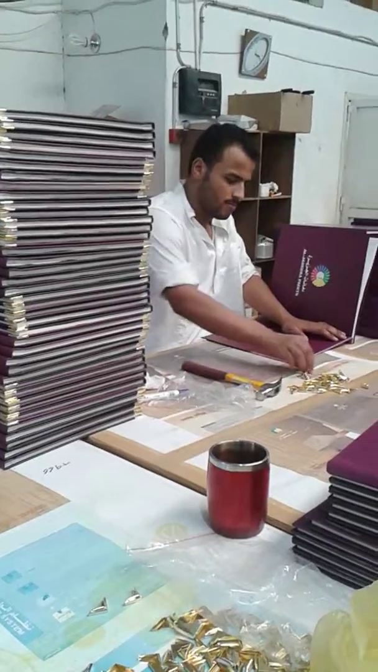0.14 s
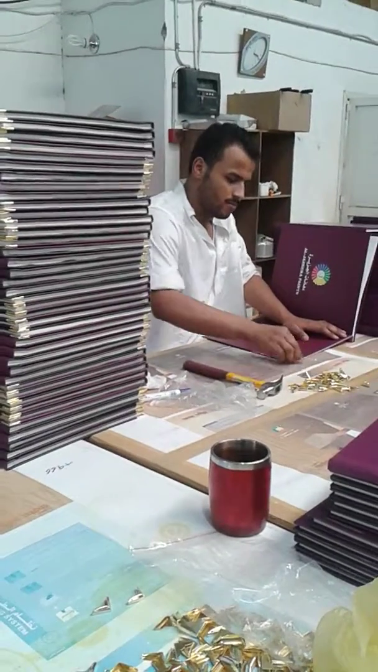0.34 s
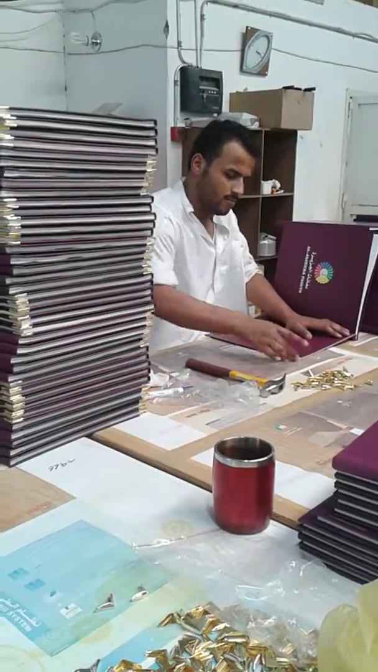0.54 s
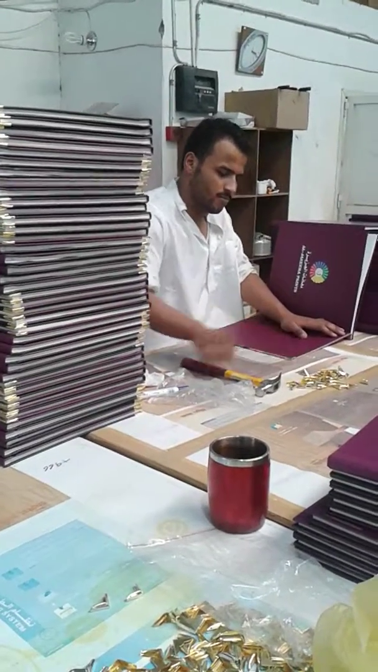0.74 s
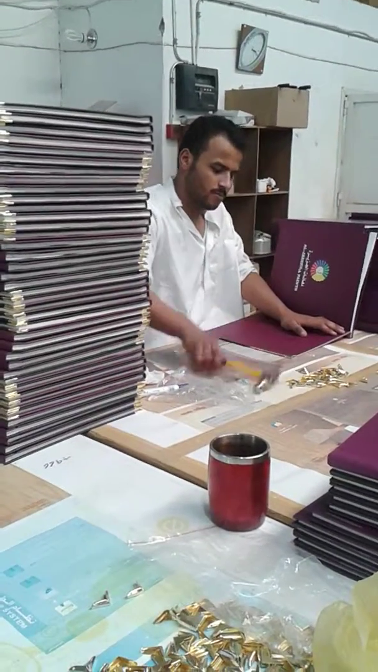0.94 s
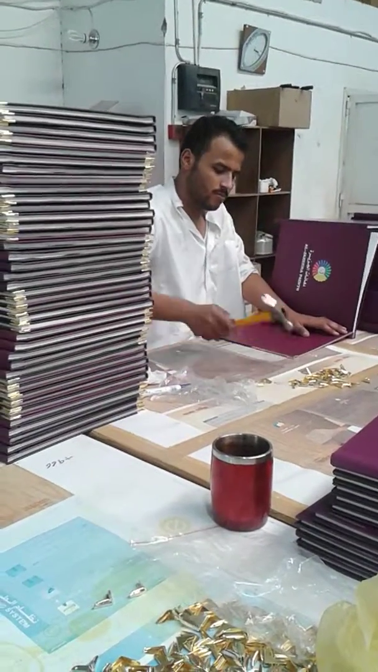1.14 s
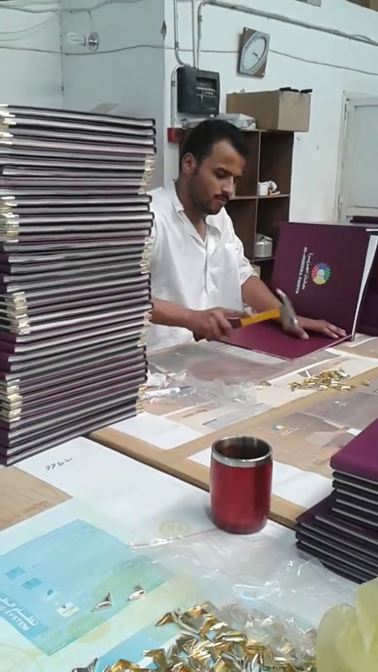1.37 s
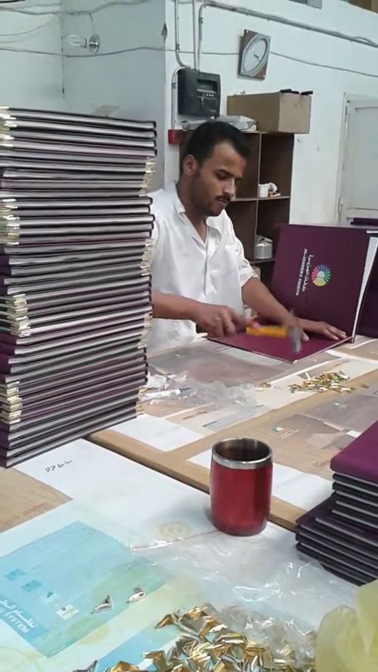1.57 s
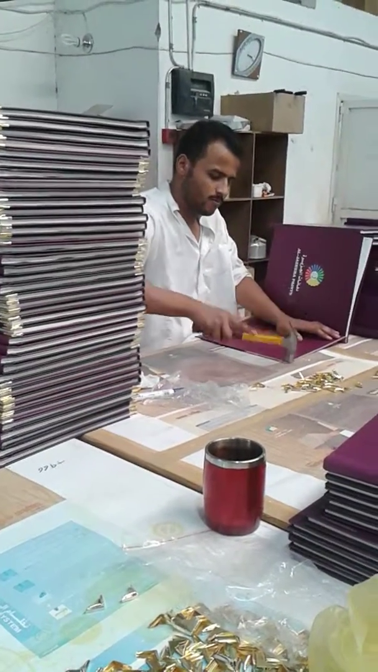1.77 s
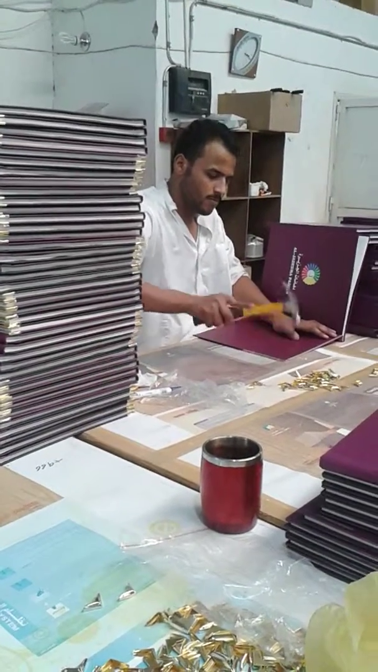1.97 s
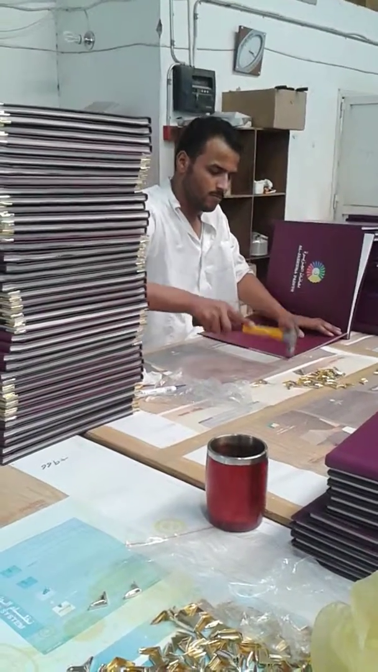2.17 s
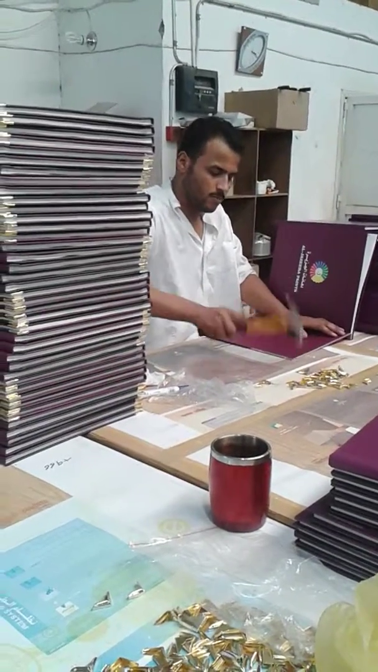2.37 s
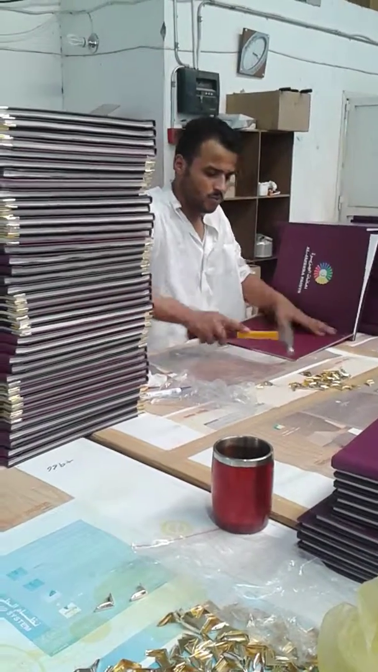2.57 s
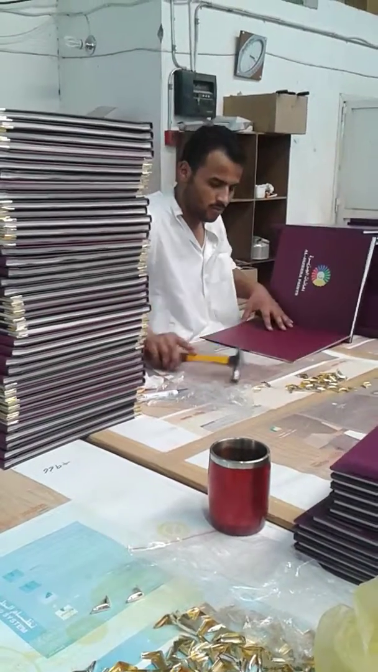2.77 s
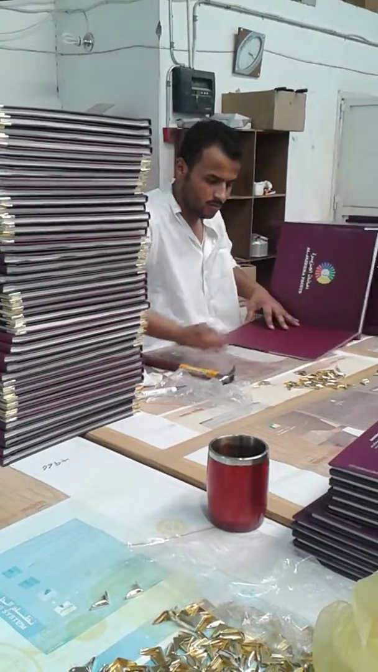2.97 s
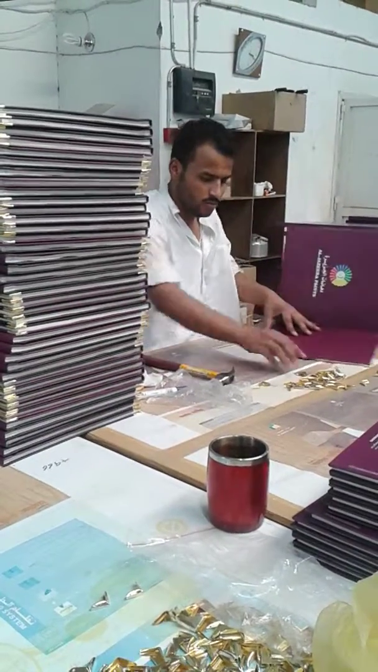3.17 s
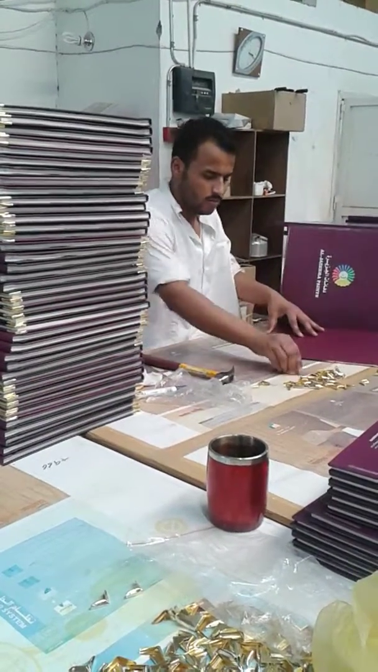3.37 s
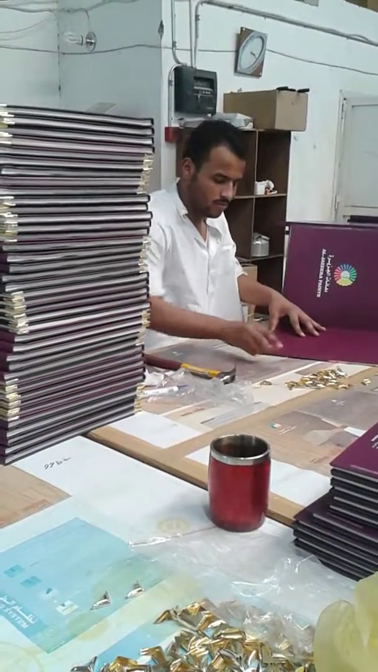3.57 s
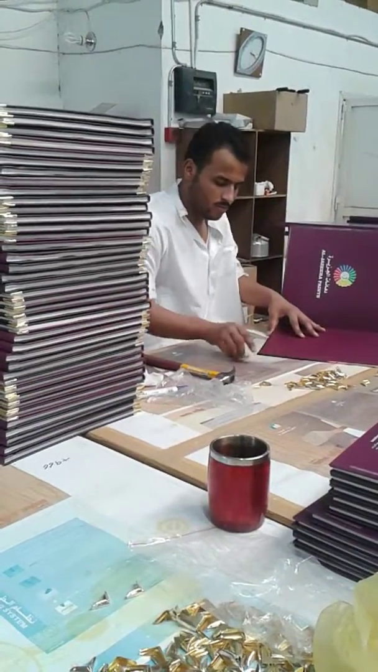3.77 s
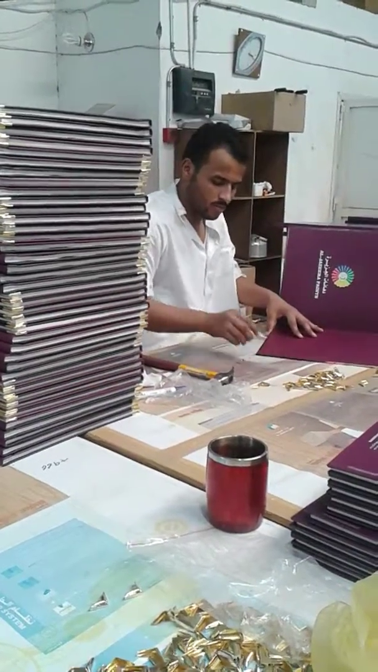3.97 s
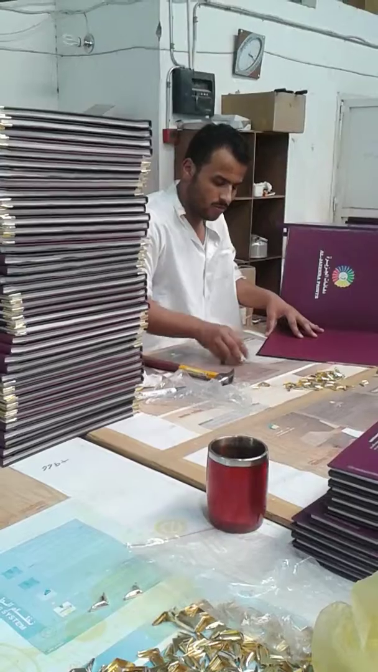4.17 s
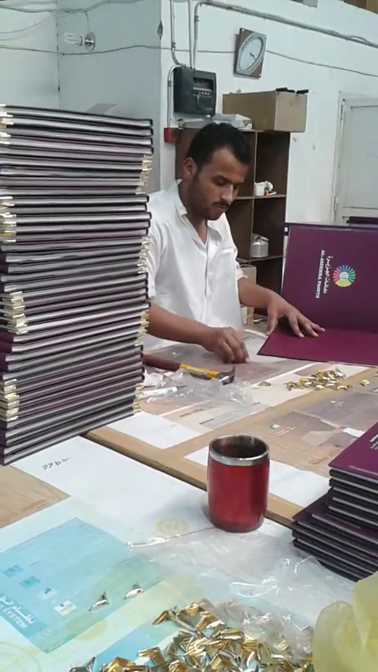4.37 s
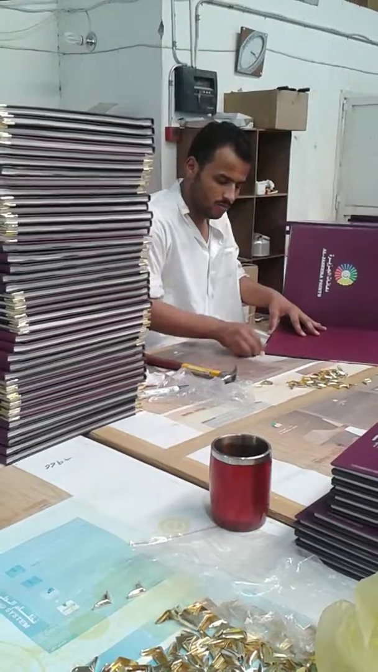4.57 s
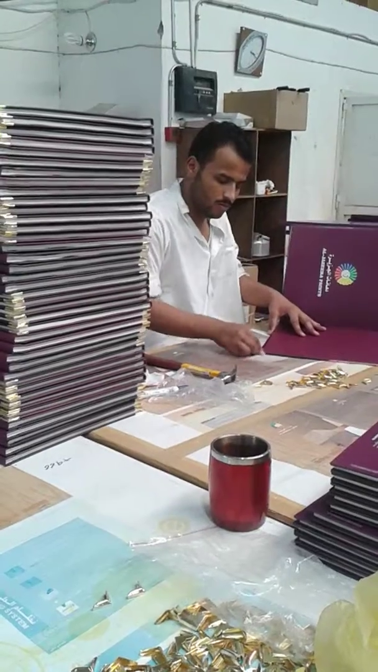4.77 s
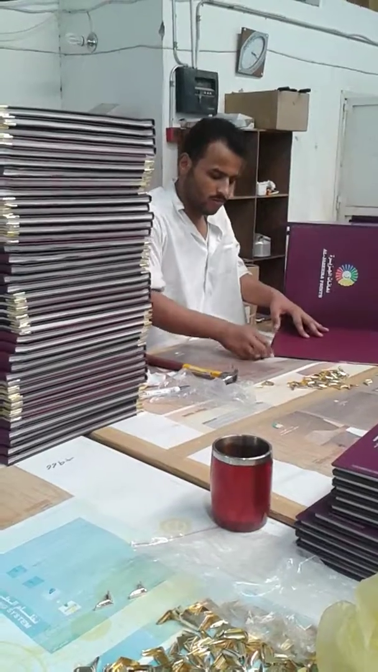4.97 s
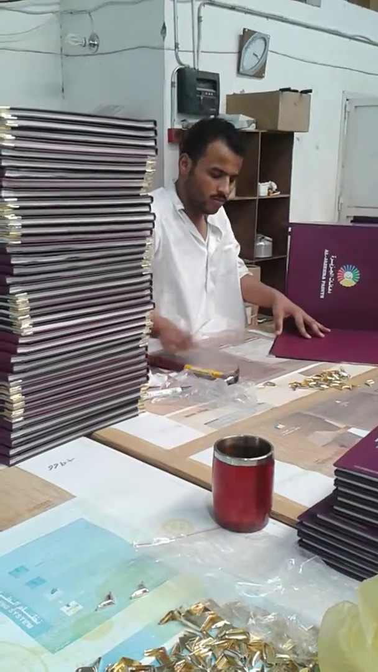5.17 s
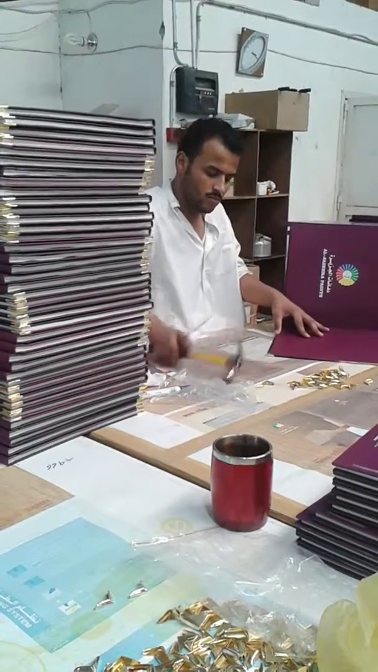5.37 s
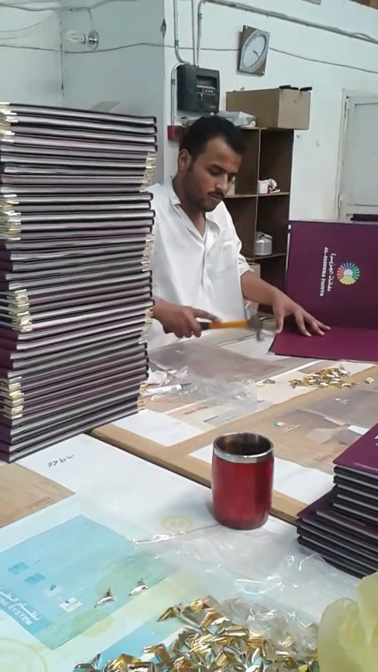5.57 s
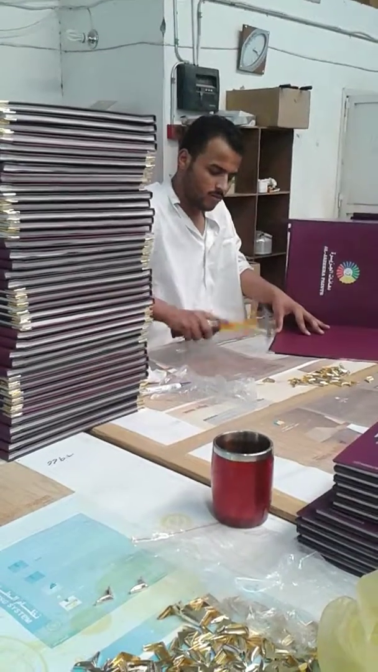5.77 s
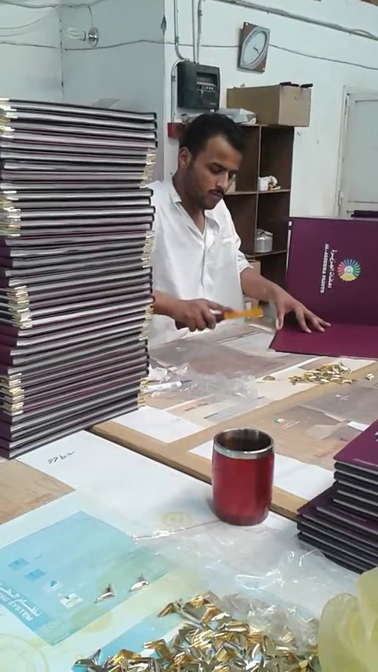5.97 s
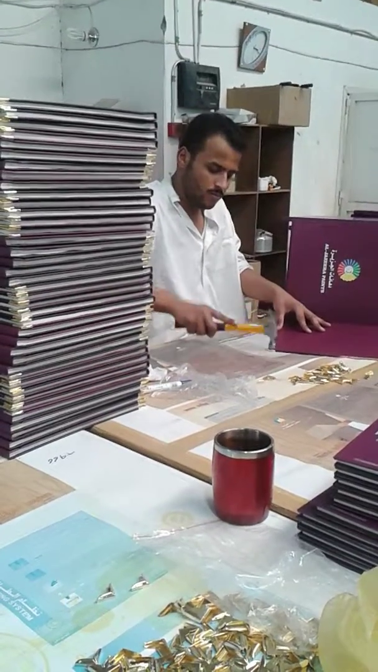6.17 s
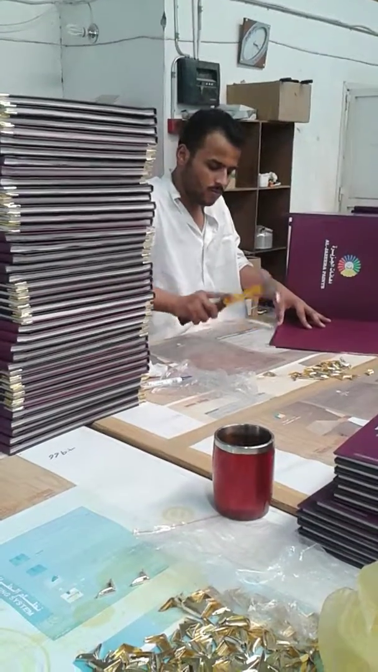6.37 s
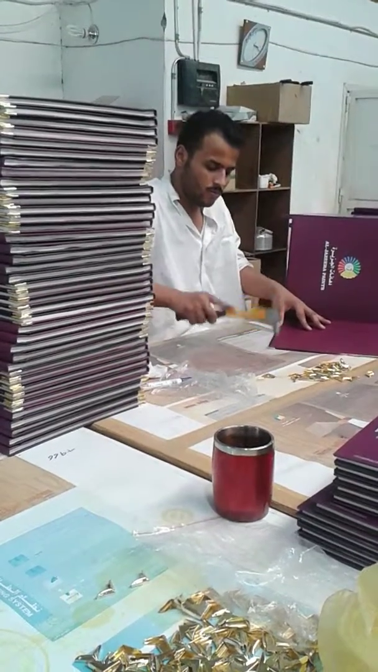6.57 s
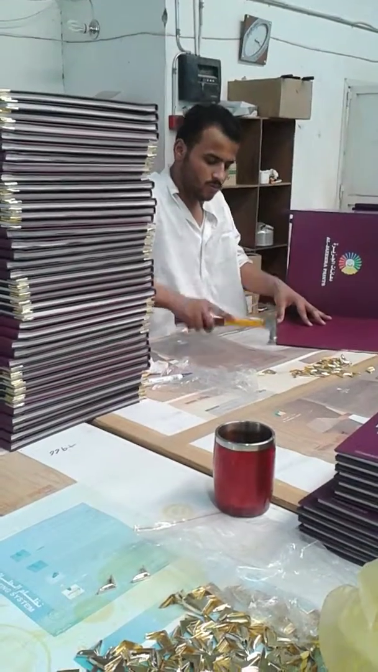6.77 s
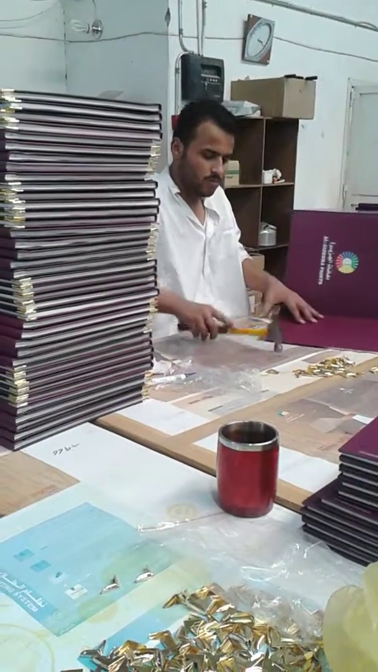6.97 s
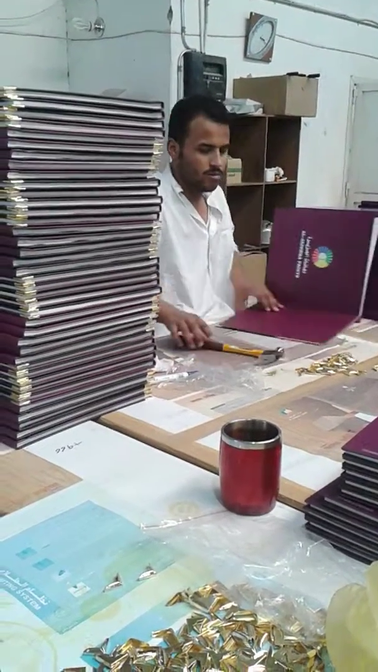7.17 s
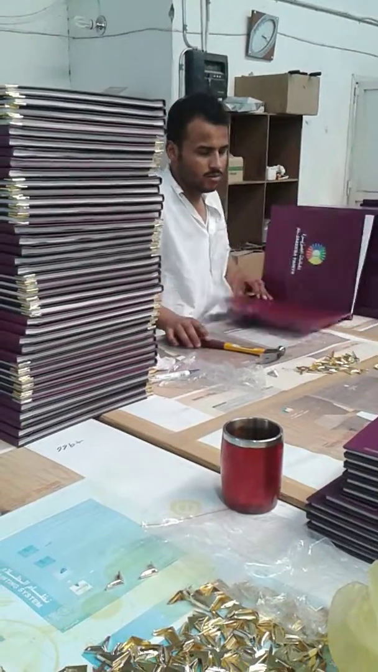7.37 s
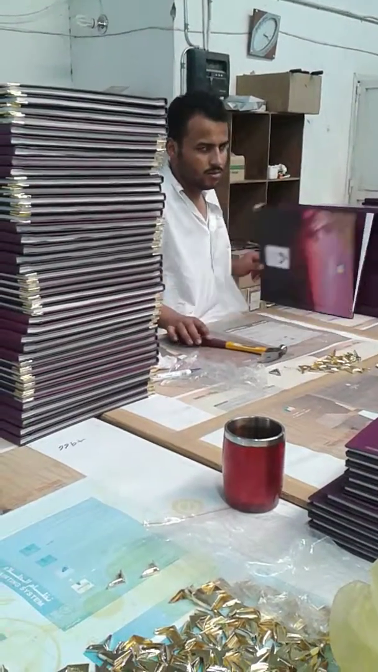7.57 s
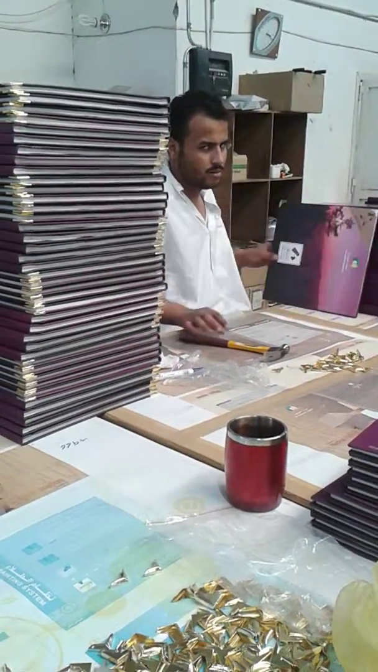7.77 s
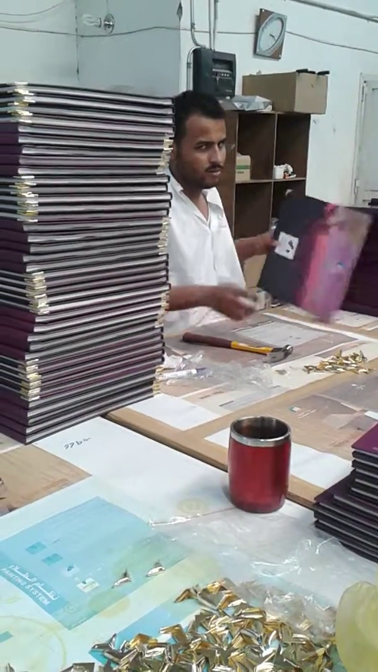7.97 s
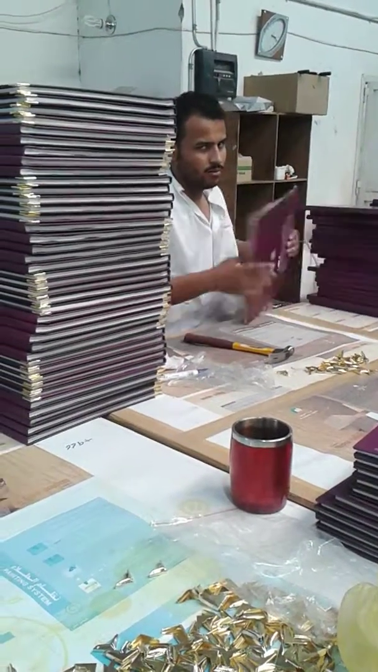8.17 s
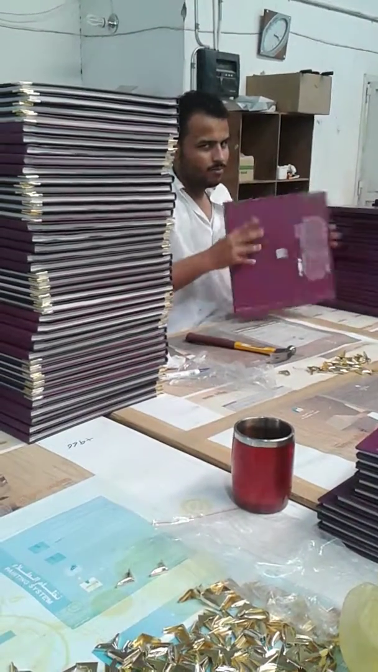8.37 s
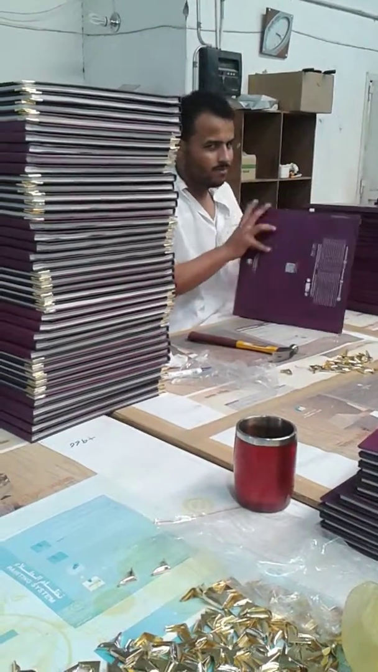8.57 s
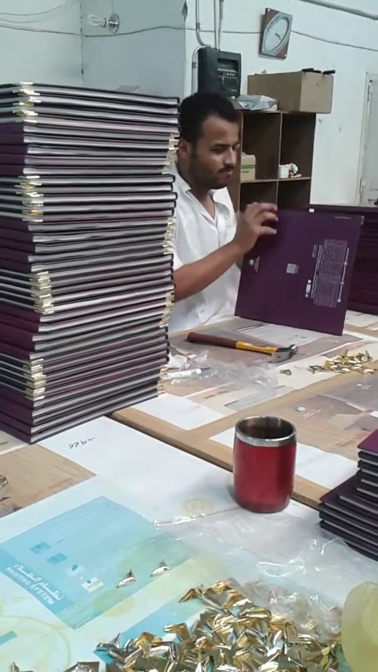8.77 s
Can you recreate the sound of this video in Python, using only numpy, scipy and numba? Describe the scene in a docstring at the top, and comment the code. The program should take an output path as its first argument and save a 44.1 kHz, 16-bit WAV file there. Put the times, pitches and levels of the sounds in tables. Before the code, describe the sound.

A claw hammer bangs metal corner pieces onto hardcover folders on a wooden table, loose pieces jingling, over a faint wavering machine whine.

```python
"""First a machine is heard further off in the workshop: wavering tones of a turning shaft over shaped noise.
Scuffs (swelling bands of noise), ticks (scratches of noise) and light taps (decaying sines) lead to the blows.
A claw hammer then beats metal corner pieces onto hardcover folders on a wooden work table: damped modes and
noise boom, a dispersed pulse shoves, a noise burst cracks and many short sines rattle as loose corner pieces.
Once a folder cover pats the table with a buzz of overtones. A limiter ducks around blows and peaks clip."""
import sys
import numpy as np
from scipy import signal
from scipy.fft import rfft, irfft, next_fast_len
from scipy.io import wavfile
from scipy.ndimage import uniform_filter1d, map_coordinates
from numba import njit

SR = 44100
rng = np.random.default_rng(int(sys.argv[2]) if len(sys.argv) > 2 else 0)


def invert_db(level):
    """Linear amplitude ratio for a level in decibels (20 dB per decade), elementwise."""
    return 10 ** (np.asarray(level, dtype=float) / 20)


def pcm_store(signal):
    """Save signal as 16-bit PCM."""
    levels = np.round(np.clip(np.atleast_2d(signal), -1, 1) * 32767)
    wavfile.write(sys.argv[1], SR, levels.astype(np.int16).T)


N = 389403  # samples


def unit(x):
    """Normalization: scale to rms 1."""
    return x / np.sqrt(np.mean(x ** 2) + 1e-20)


def along(points, hz):
    """Interpolation on a logarithmic frequency axis of points (frequency [Hz], value)."""
    f, v = np.transpose(points)
    return np.interp(np.log(hz + 1), np.log(f + 1), v)


def wobble(rate):
    """Slow random modulation: a smooth curve through `rate` random knots a second."""
    return map_coordinates(rng.standard_normal(int(N * rate / SR) + 4), [np.arange(N) * rate / SR])


def filtered(x, response):
    """Linear filtering: the spectrum of x times a response of frequency."""
    m = next_fast_len(len(x) + 8192)
    return irfft(rfft(x, m) * response(np.fft.rfftfreq(m, 1 / SR)), m)[:len(x)]


def noise(t):
    """White noise: equal power at every frequency."""
    return rng.standard_normal(len(t))


def dying(t60s, colour_db, size):
    """Frequency-dependent damping: noise starts at once and each band fades at its own rate; energy 1."""
    hz, t, z = signal.stft(rng.standard_normal(size + 512), SR, nperseg=512)
    t60 = np.clip(along(t60s, hz), .01, 3)[:, None]
    gain = invert_db(colour_db(hz)[:, None] - 60 * t / t60)
    tail = signal.istft(z * gain, SR, nperseg=512)[1][:size]
    return tail / np.linalg.norm(tail)


def add(track, s, x):
    """Superposition: mix x into track at s seconds."""
    part = track[round(s * SR):][:len(x)]
    part += x[:len(part)]


# hammer blows: (time [s], table level [dB], crack level [dB], rattle level [dB], contact brightness [dB/octave],
# ring brightness [dB/octave], place along the table [0-1])
HAMMER_BLOWS = [(1.533, -3, -22, -35.5, -1, -4, 0.54), (1.854, 0, 5, -37.5, -2, -2.5, 1),
                (2.153, 3, -3, -36, 1.5, -2, 0.67), (2.409, -1, 7, -31, 0.5, -3.5, 0.4),
                (2.469, 1.5, 10, -38, 3, -1.5, 0.6), (2.785, 1, 17.5, -31, 3.5, -7, 0.5),
                (2.99, -4.5, -14, -42, 4, 0.5, 0.42), (3.107, 1, 11.5, -31.5, 0.5, -3.5, 0.67),
                (3.452, 2, 20, -29, 1.5, 1.5, 0.32), (3.898, 2.5, 22, -30, -1, 8, 0.6),
                (4.1, -6, 8.5, -38, 8.5, 4.5, 1), (5.863, -4, 1, -35.5, 2, -6, 0),
                (6.188, -5.5, 4, -35, 4, -7.5, 0.5), (6.504, 4, 14, -35, 2.5, 5, 0.42),
                (6.835, 6.5, 15, -34, 3, 4, 0.9), (7.121, -1, 12, -42, -1.5, 13, 0.85),
                (7.345, -6, 12.5, -31.5, 7.5, -1.5, 0.95), (7.74, 0.5, 12, -30.5, 5, -0.5, 0.88),
                (8.498, -2.5, 17, -32, 5.5, -2, 1)]


def hammer():
    """Impact excitation: each blow cracks on metal, shoves and rings the table and shakes loose pieces."""
    out, t = np.zeros(N), np.arange(SR * 3 // 4) / SR
    for s, boom_db, crack_db, rattle_db, bright, ring_bright, place in HAMMER_BLOWS:
        ring = invert_db(-7.5) * table_modes(t, place, ring_bright) + invert_db(23) * table_body(t, ring_bright)
        # the top hops on its frame, then settles
        shudder = 1 + 0.75 / (1 + np.exp(np.minimum((t - .058) / 0.0086, 50)))
        # small rebounds break the tail into lumps
        shudder = shudder * invert_db(2.2 * wobble(70)[:len(t)])
        onset = 1 - np.exp(-(t / 0.0045) ** 2)
        wood = (ring * shudder + invert_db(25.0) * slap(t, bright)) * onset + shove(t, bright)
        jingle = rattle_colour(rattle(t, count=160), rattle_db)
        blow = invert_db(boom_db) * wood + invert_db(crack_db) * crack(t) + invert_db(rattle_db) * jingle
        add(out, s, in_room(blow, wet_db=-8.0, delay=.006))
    return out


def octaves(f):
    """Spectral tilt: octaves from about 400 Hz, held level above the frequency where the tilt ends."""
    tilt_top_hz = 1420
    return np.log2((np.minimum(f, tilt_top_hz) + 30) / 400)


# table top modes: (frequency [Hz], level struck at the near end [dB], level at the far end [dB], slow t60 [s])
TABLE_MODES = [(116, -14, -17, 0.72), (155, -13.5, -18.5, 0.69), (226.2, -0.5, -11, 0.47),
               (273, -14, -12.5, 0.31), (334.3, -2, 3, 0.29), (408.4, -3, -3, 0.059),
               (489, -0.5, -0.5, 0.07), (651, -9.5, -18, 0.045), (793, -13.5, -8.5, 0.02),
               (996, -5.5, -12.5, 0.06)]


def table_modes(t, place, ring_bright):
    """Modal superposition: damped sines whose levels depend on where the table is struck."""
    hz, near_db, far_db, t60 = np.transpose(TABLE_MODES)[:, :, None]
    level = near_db + np.clip(place, 0, 1) * (far_db - near_db)
    # each spot struck drives the modes differently
    spot = rng.standard_normal((len(TABLE_MODES), 3))
    scatter_db, start = 1.2 * spot[:, :1], 0.3 * spot[:, 2:]
    pitch = hz * (1 + 0.012 * spot[:, 1:2])
    # things lying on the top blur the modes
    wander = 0.013 * np.cumsum(rng.standard_normal((len(TABLE_MODES), len(t))), axis=1)
    tilt_db = 0.61 * ring_bright * np.maximum(octaves(hz), -0.3)
    swing = invert_db(level + scatter_db + tilt_db) * np.sin(2 * np.pi * pitch * t + start + wander)
    # near the spot the first swings are far larger
    fade = invert_db(-60 * t / t60) + 5 * invert_db(-60 * t / 0.061)
    return (swing * fade).sum(axis=0) / np.linalg.norm(invert_db(level))


# dense table ring, before tilt: (frequency [Hz], relative level [dB per Hz])
BODY_COLOUR = [(15, -61), (25, -40), (158, -10), (222, 6), (277, -6), (338, 0.5), (642, -9.5),
               (1290, -11.5), (2410, -25), (3000, -31), (3900, -18), (6600, -120)]
# its damping: (frequency [Hz], t60 [s])
BODY_FADE = [(60, 0.13), (300, 0.32), (1000, 0.14), (1500, 0.076), (3000, 0.013)]


def table_body(t, ring_bright):
    """High modal density: modes too close to separate ring as coloured, decaying noise."""
    def colour_db(f):
        tilt_db = ring_bright * np.maximum(octaves(f), -0.3)
        return along(BODY_COLOUR, f) + tilt_db + 3 * np.minimum(octaves(f), 1.2)
    return dying(BODY_FADE, colour_db, size=len(t))


def slap(t, bright):
    """Contact stiffness: a harder contact gives a brighter, quickly damped burst."""
    def colour_db(f):
        return along(BODY_COLOUR, f) + bright * octaves(f)
    return dying([(300, 0.044), (1500, 0.059)], colour_db, size=len(t))  # (frequency [Hz], t60 [s])


def shove(t, bright):
    """Dispersion of bending waves: the treble travels faster, so the first push falls in pitch."""
    level_db, centre_hz = 26, 428
    lag = 0.0024  # s, of waves at 400 Hz behind the fastest

    def push(f):
        band = f / centre_hz / (1 + (f / centre_hz) ** 3.54)
        # the second term moves the whole chirp a little earlier
        bending = np.exp(-4j * np.pi * lag * np.sqrt(400 * f) + 2j * np.pi * f * lag / 10)
        return invert_db(bright * octaves(f)) * band * bending
    chirp = filtered(1.0 * (t == 0), push)
    return invert_db(level_db) * chirp / np.linalg.norm(chirp)


def crack(t):
    """Broadband impact noise: metal on metal gives a short burst with a quick onset."""
    burst = filtered(noise(t), lambda f: f / (f + 1500) / (1 + (f / 5500) ** 3))
    return burst * invert_db(-60 * t / 0.019) * (1 - np.exp(-t / 0.0032))


def rattle(t, count):
    """Many random micro-impacts: loose corner pieces jump with the table and land in a dense jingle."""
    piece_hz, piece_spread = 4704, 0.115  # main ring of a piece, and its relative scatter either way
    when, pitch, size = rng.random((count, 3)).T
    landing = .008 + 0.046 * when[:, None] ** 1.1  # s after the blow
    age = np.maximum(t[:SR // 6] - landing, 0)
    hz = 2600 * 5.6 ** pitch[:, None]
    hz[::4] = piece_hz * (1 + piece_spread * (2 * pitch[::4, None] - 1))
    # each ring loses 60 dB in 160 cycles
    level_db = 2.8 * size[:, None] ** 3 - 4 * pitch[:, None] - 60 * age * hz / 160
    clinks = invert_db(level_db) * np.sin(2 * np.pi * hz * age)
    clinks = np.pad(unit(clinks.sum(axis=0)), (0, len(t) - SR // 6))
    fizz = filtered(noise(t), lambda f: f / (f + 5000) * (1 + 0.27 * (f / 13000) ** 4))
    fizz = fizz * (t / 0.033 * np.exp(1 - t / 0.042)) ** 2
    return clinks + 0.7 * fizz * invert_db(2.2 * wobble(250)[:len(t)])


def rattle_colour(jingle, rattle_db):
    """Level-dependent spectrum: pieces that are shaken harder sound brighter."""
    tilt = 0.51 * (rattle_db + 32.5)  # dB per octave
    return filtered(jingle, lambda f: invert_db(tilt * np.log2((f + 2000) / 7000)))


# light taps, rebounds of the hammer and things laid down:
# (time [s], knock level [dB], pitch [Hz], table thud level [dB])
LIGHT_TAPS = [(.603, -2, 1094, -19), (0.677, -9.5, 750, -20.5), (.693, -17, 1135, -30),
              (0.852, -27, 705, -22), (1.935, -14, 1175, -31), (2.258, -7.5, 1173, -14.5),
              (2.554, -9.5, 1280, -26), (2.828, -5, 940, -4), (3.03, -6, 500, -16), (3.15, -4, 810, -24),
              (3.501, -4, 1035, -12), (3.883, -18, 994, -14), (3.945, 4, 558, -8), (4.114, 3.5, 1160, -12),
              (5.963, -3, 1276, -18), (6.287, 0.5, 1203, -13.5), (6.637, 4, 1223, -11),
              (6.979, 4.5, 1247, -9.5), (7.167, -2, 384, -7), (7.781, -6, 794, -14),
              (8.131, -17.5, 1094, -22.5), (8.531, -14, 1140, -24), (8.553, -12, 395, -16)]


def taps():
    """Light impact: a rough knock at its own pitch, a swing of the table modes and some metal grit."""
    lower_ratio, lower_db = 0.8, -3  # second, lower mode: pitch ratio and level
    grit_db = -23.5  # under the knock
    out, t = np.zeros(N), np.arange(SR // 2) / SR
    mode_hz, level, _, _ = np.transpose(TABLE_MODES)[:, :, None]
    for s, db, hz, thud_db in LIGHT_TAPS:
        def knock_band(f):
            return 1 / (1 + ((f - hz) / (0.24 * hz)) ** 4) + 0.07 / (1 + (f / 2300) ** 6)
        rough = unit(filtered(noise(t), knock_band))
        pair = np.sin(2 * np.pi * hz * t) + invert_db(lower_db) * np.sin(2 * np.pi * lower_ratio * hz * t)
        # higher knocks fade faster
        knock = (0.62 * pair + 0.45 * rough) * invert_db(-60 * t * (hz / 1000) ** 0.4 / 0.045)
        spot = rng.standard_normal((len(TABLE_MODES), 2))
        swing = invert_db(level + 4.1 * spot[:, :1] - 60 * t / 0.058)
        swing = swing * np.sin(2 * np.pi * mode_hz * t + 2 * spot[:, 1:])
        tap = invert_db(db) * (knock + invert_db(grit_db) * grit(t)) + invert_db(thud_db) * swing.sum(axis=0)
        onset = 1 - np.exp(-t / 0.0015)
        add(out, s, in_room(tap * onset, wet_db=-8.5, delay=0.00542))
    return out


# a folder cover patting the table: (time [s], level [dB], pitch [Hz], length to half amplitude [s])
COVER_PATS = [(5.301, -15, 349, 0.01)]


def pats():
    """Harmonic series: a short buzz with overtones that stops as the cover settles."""
    out, t = np.zeros(N), np.arange(SR // 3) / SR
    for s, db, hz, length in COVER_PATS:
        buzz = sum(invert_db(-6.5 * k) * np.sin(2 * np.pi * (k + 1) * hz * t + k) for k in range(4))
        shape = (1 - np.exp(-t / 0.0017)) / (1 + (t / length) ** 6)
        add(out, s, invert_db(db) * in_room(buzz * shape, wet_db=-7, delay=0.0062))
    return out


# single corner pieces ticking on the table: (time [s], level [dB])
PIECE_TICKS = [(0.098, -24), (.96, -27), (3.15, -21), (5.292, -24), (5.944, -18), (7.795, -12.5),
               (8.133, -20.5)]


def ticks():
    """Small hard impact: a loose corner piece lands with a dry scratch."""
    out, t = np.zeros(N), np.arange(SR // 3) / SR
    for s, db in PIECE_TICKS:
        scratch = grit(t) * (1 - np.exp(-t / 0.00058))
        add(out, s, invert_db(db) * in_room(scratch, wet_db=-4.0, delay=0.0079))
    return out


def grit(t):
    """Resonant noise: a short metallic scratch, strongest around 3.7 kHz."""
    band = filtered(noise(t), lambda f: 1 / (1 + ((f - 3700) / 1300) ** 2) + 0.019)
    return invert_db(-60 * t / 0.061) * unit(band)


# hands and folders sliding: (middle time [s], half length to 1/e [s], level [dB], band centre [Hz])
SLIDES = [(0.8, 0.14, -35.5, 1530), (0.698, 0.05, -29, 280)]


def scuffs():
    """Friction noise: sliding contact is a grainy band of noise that swells and fades."""
    t, out = np.arange(N) / SR, np.zeros(N)
    for s, half, db, hz in SLIDES:
        band = unit(filtered(noise(t), lambda f: 1 / (1 + ((f - hz) / (0.68 * hz)) ** 4)))
        out += invert_db(db + 3.5 * wobble(110)) * np.exp(-((t - s) / half) ** 2) * band
    return out


# shaft tones, before they waver: (multiple of the shaft speed, level [dB rms])
SHAFT_TONES = [(102, -50), (108, -42), (110, -50), (113, -48), (114, -48), (117, -47), (120, -48),
               (123, -52), (125, -51), (126, -51), (201, -57), (204, -51), (210, -53), (213, -54),
               (218, -56)]
# swelling and sinking of the 96th multiple: (time [s], level [dB rms])
LOUDEST_SWELL = [(0.0, -40.5), (0.37, -45.5), (1.28, -40.5), (2.21, -45), (2.66, -40.5), (3.15, -43),
                 (3.34, -36.5), (4.131, -45), (4.33, -36), (4.89, -43), (5.31, -34), (5.85, -38),
                 (6.22, -31.5), (6.52, -37.5), (8.12, -34), (8.83, -38.5)]
# lower tones, before they waver: (frequency [Hz], level [dB rms])
LOW_TONES = [(565.2, -45), (1405, -53.5), (1486, -53)]
# colour of the machine's hiss: (frequency [Hz], relative level [dB per Hz])
HISS_COLOUR = [(15, -63), (40, -30), (100, -12), (335, -1.5), (560, -7), (1400, -8), (2220, -11),
               (2600, -9.5), (2950, -1.5), (3600, -2), (4300, -4.5), (5100, -11.5), (6210, -7.5),
               (7200, -11), (10700, -19), (14400, -28), (16000, -35)]


def machine():
    """Periodic excitation: tones at multiples of a shaft speed waver over a hiss that partly repeats each turn."""
    shaft_hz, hiss_db = 29.48, -31.5  # mean speed; hiss level before its flutter
    whine_follows = 0.16  # share of the loudest tone's swells that the other shaft tones follow
    swell_db = np.interp(np.arange(N) / SR, *np.transpose(LOUDEST_SWELL))
    drift = np.cumsum(1 + 0.000686 * wobble(6)) / SR  # s, running slightly unevenly

    def tone(hz, db):
        return np.sqrt(2) * invert_db(db) * np.sin(2 * np.pi * (hz * drift + rng.random()))
    hum = sum(tone(hz, db + 1.8 * wobble(9) + 2.2 * wobble(30)) for hz, db in LOW_TONES)
    whine = sum(tone(k * shaft_hz, db + 2.67 * wobble(7) + 2.6 * wobble(25)) for k, db in SHAFT_TONES)
    whine = whine * invert_db(whine_follows * (swell_db - swell_db.mean()))
    loudest = tone(96 * shaft_hz, swell_db + 1.5 * wobble(20))
    # one turn of noise, read again on every turn
    turn = rng.standard_normal(round(SR / shaft_hz))
    repeat = np.interp(drift * shaft_hz % 1 * len(turn), np.arange(len(turn)), turn)
    gears = filtered(repeat, lambda f: invert_db(-14 * np.log2((f + 1) / 3500) ** 2) * 0.62)
    hiss = unit(filtered(rng.standard_normal(N) + gears, lambda f: invert_db(along(HISS_COLOUR, f))))
    flutter_db = .7 * wobble(9) + .6 * wobble(2)
    return invert_db(hiss_db + flutter_db) * hiss + hum + whine + loudest


# reverberation of the workshop: (frequency [Hz], t60 [s])
ROOM_FADE = [(100, 0.75), (400, 0.94), (1200, 0.58), (4000, 1), (12000, 0.33)]


def in_room(x, wet_db, delay):
    """Reverberation: a sound plus a delayed, decaying answer, drawn anew for each impact."""
    drive_t60 = .05  # s; mostly the first large swings of an impact fill the workshop
    tail = dying(ROOM_FADE, lambda hz: 0 * hz, size=len(x))
    tail = np.pad(tail, (round(delay * SR), 0))
    early = x * invert_db(-60 * np.arange(len(x)) / SR / drive_t60)
    return x + invert_db(wet_db) * signal.fftconvolve(early, tail)[:len(x)]


def scene():
    """Superposition of pressures: all sources reach one microphone."""
    return (hammer() + taps() + pats() + ticks() + scuffs() + machine())[None]


@njit
def follower(x, fall):
    """Peak detection: a level that jumps up at once and sinks slowly."""
    level, out = 0.0, np.empty_like(x)
    for i in range(len(x)):
        level = max(abs(x[i]), level * fall)
        out[i] = level
    return out


def roll_off(x):
    """The treble ends steeply here."""
    return signal.sosfilt(signal.butter(12, 16340, fs=SR, output="sos"), x)


def record(dry):
    """Dynamic range compression: a limiter ducks over some ms around blows; swings still too large clip."""
    # first-order bass cut at 60 Hz, treble limit at 15150 Hz
    x = filtered(dry[0], lambda f: 1j * f / (1j * f + 60) * (f < 15150))
    # threshold -8 dB; the followed level sinks 300 dB per second
    peak_db = 20 * np.log10(follower(x, invert_db(-300 / SR)) + 1e-9)
    over_db = np.maximum(peak_db + 8, 0)
    cut_db = uniform_filter1d(.35 * over_db, round(.016 * SR))
    # the smoothed cut acts 1.3 ms later
    x = x * invert_db(-np.interp(np.arange(N) - 0.0013 * SR, np.arange(N), cut_db))
    # rounded clipping at 0.705
    x = x / (1 + np.abs(x / .705) ** 12) ** (1 / 12)
    x = filtered(x, lambda f: f < 16100)
    return roll_off(x[None])


dry = scene()
out = record(dry)
pcm_store(out)
```